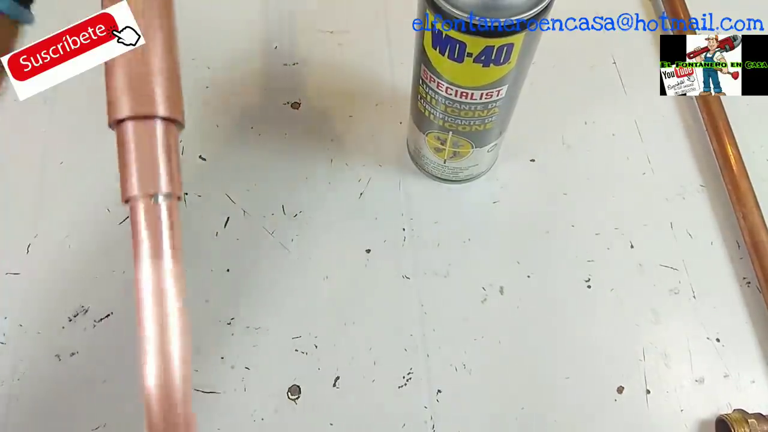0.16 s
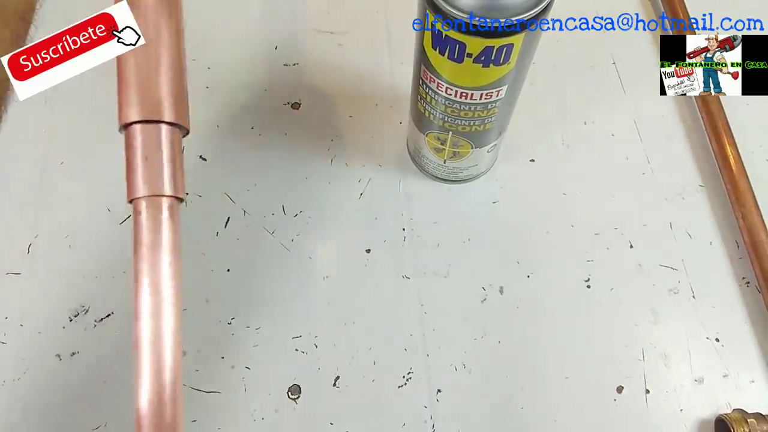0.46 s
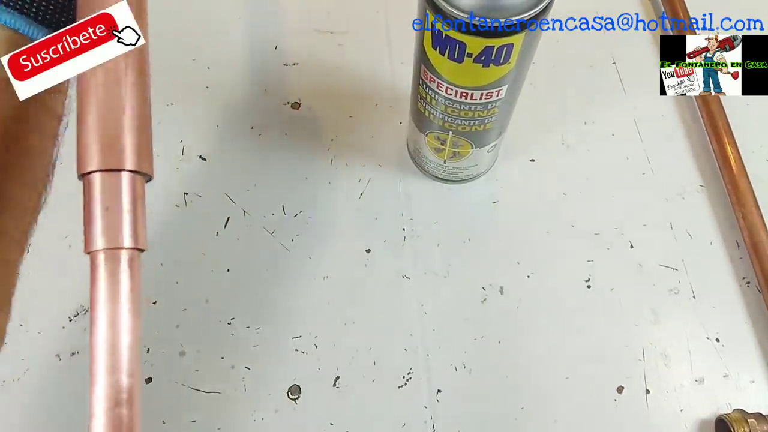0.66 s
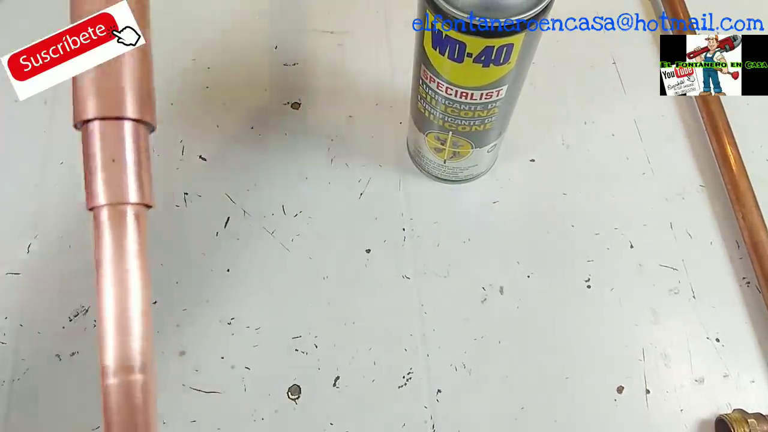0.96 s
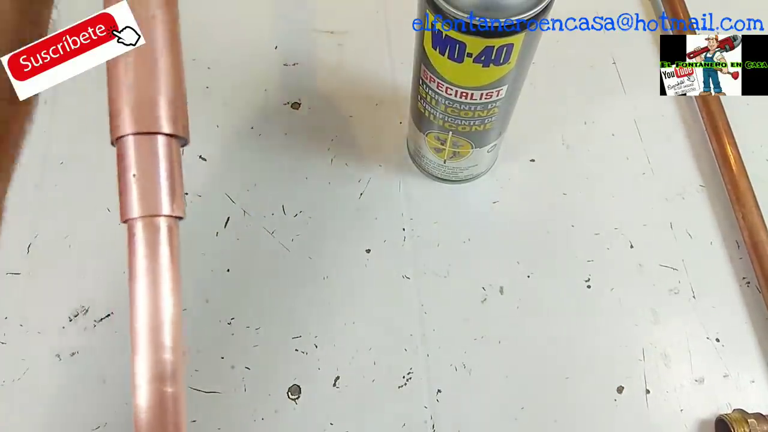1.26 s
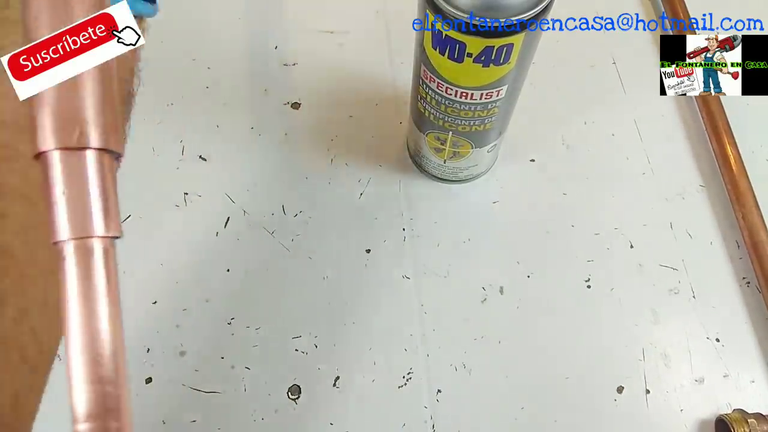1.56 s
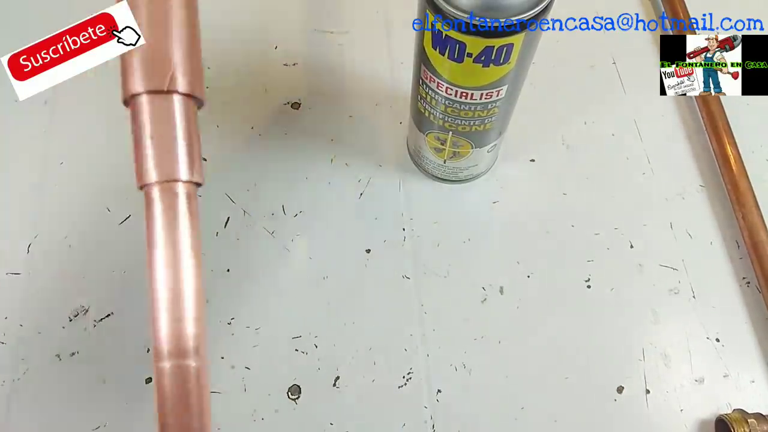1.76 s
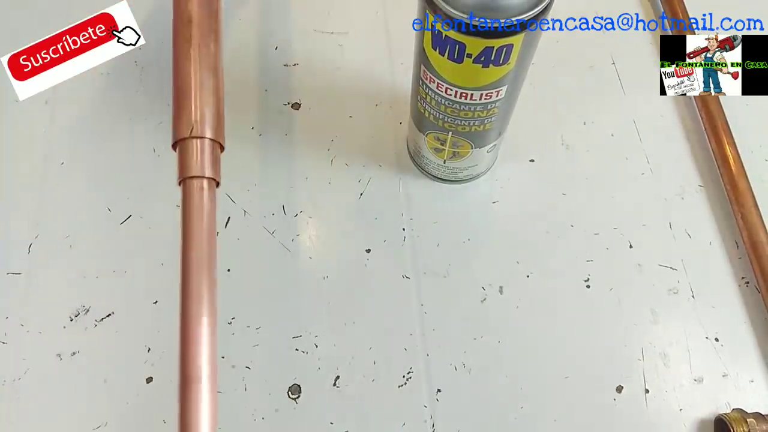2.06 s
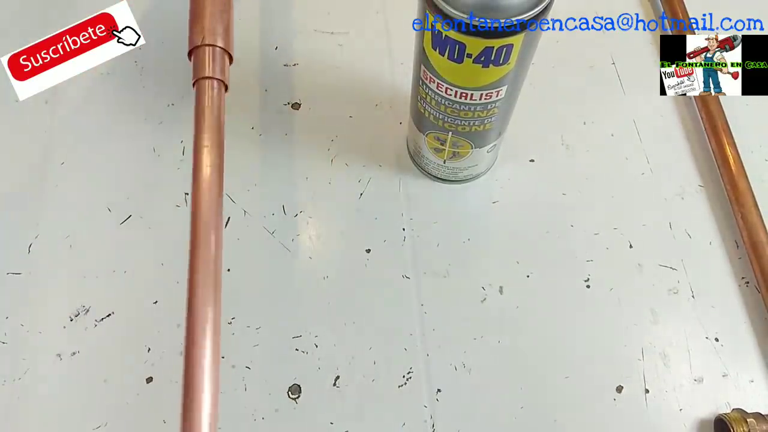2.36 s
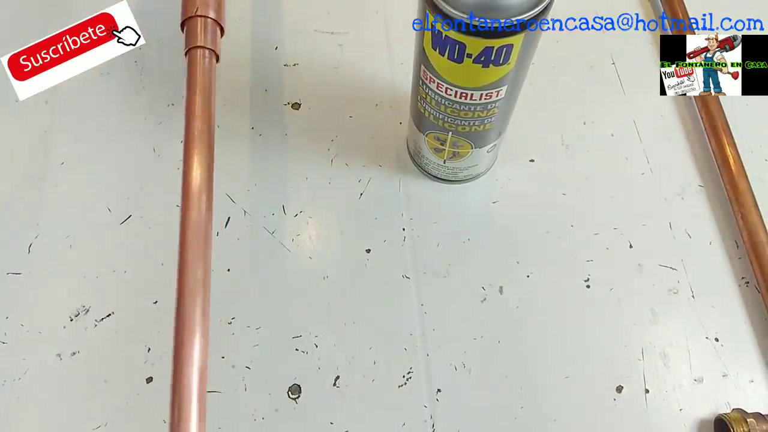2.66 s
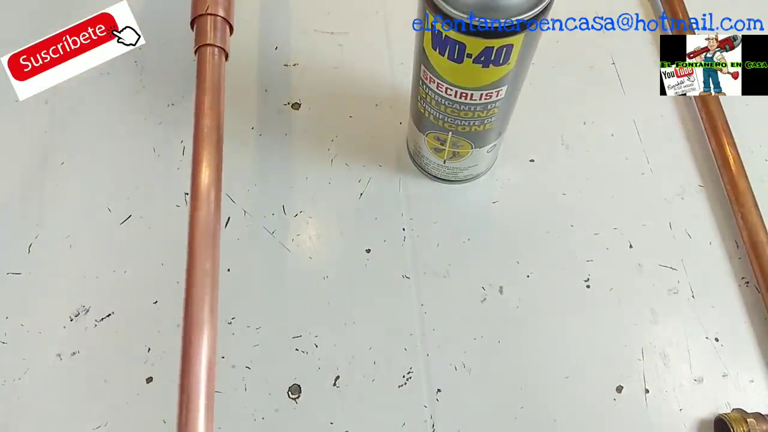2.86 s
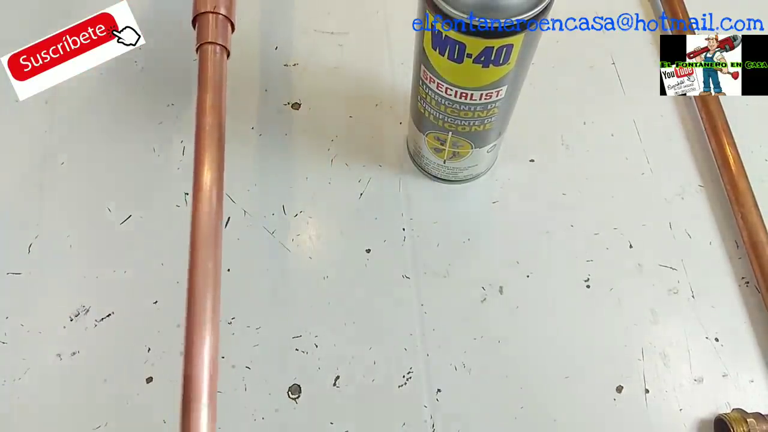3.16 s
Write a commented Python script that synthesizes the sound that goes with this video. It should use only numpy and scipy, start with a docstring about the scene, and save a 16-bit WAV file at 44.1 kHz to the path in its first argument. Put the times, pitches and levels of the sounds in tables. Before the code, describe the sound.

Rubbing of an oiled metal tube sliding in a pipe, ending with a hard metallic knock.

```python
"""Hands twist and slide an oiled copper tube into a wider pipe, close to a two-port microphone.
From the start skin and rubber rings swish on metal and the far end drags on a workbench, all as
shaped, gritty noise; early snags click, then the rings squeak faintly as gliding sines. Later the
pipe bumps on the bench and hums as narrow noise; near the end it knocks once hard, ringing decaying
modes, and brief rubbing follows. Room noise in a small quiet room lies under everything."""
import sys
import numpy as np
from scipy import signal
from scipy.fft import rfft, irfft
from scipy.io import wavfile
from scipy.ndimage import uniform_filter1d, map_coordinates

SR = 44100
rng = np.random.default_rng(int(sys.argv[2]) if len(sys.argv) > 2 else 0)


def materialize(psi):
    """Save the field psi as 16-bit PCM at rate SR to the path in sys.argv[1].

    A 1-D psi becomes a single channel; in a 2-D psi each row is a channel.
    """
    bounded = np.clip(np.atleast_2d(psi).T, -1, 1)
    quanta = np.round(bounded * 32767).astype(np.int16)
    wavfile.write(sys.argv[1], SR, quanta)


def undo_db(level):
    """Turn decibels back into plain size, where 20 dB means ten times bigger."""
    steps = np.asarray(level, float) / 20
    return 10 ** steps


N = 145530

# Strokes of the hands, in groups.
# Each row: time in seconds, level of the swish in dB, lift of the rubbing's top octave in dB.
STROKES = [
    [(0.0, -52.5, -7), (0.03, -39.5, -4), (0.07, -38, 1), (0.14, -48.5, -3), (0.19, -34.5, -2.5),
     (0.27, -44.5, -2.5), (0.33, -36, -1.5), (0.43, -38.5, 3), (0.45, -40.5, 2), (0.49, -36.5, 5.5),
     (0.56, -35.5, -1), (0.6, -41.5, -2.5), (0.67, -40.5, -1), (0.76, -50, 1), (0.78, -54.5, -1),
     (0.87, -56.5, 0), (0.88, -44.5, -2), (0.91, -36, 0.5), (0.99, -44, -1), (1.04, -32.5, -1.5),
     (1.1, -35, 6), (1.23, -41, 4), (1.25, -36, 0), (1.31, -47, -2.5), (1.49, -63.5, 3), (1.52, -54, -6),
     (1.58, -60, -6), (1.62, -38, 0), (1.7, -36, 1.5), (1.75, -47, 2), (1.79, -34.5, -3.5),
     (1.88, -36.5, 7), (1.99, -43.5, 3.5), (2.01, -35, 0), (2.04, -40.5, -6), (2.16, -52.5, -7),
     (2.24, -52, -3), (2.31, -42, 1), (2.48, -46, 3), (2.56, -54.5, -1), (2.65, -48, -2),
     (2.77, -62.5, 3.5), (2.91, -56.5, -4), (3.0, -76, 0)],
    [(3.16, -55, -8), (3.176, -56.5, -1), (3.252, -44, -1), (3.3, -39, -1)],
]
# Rubbing of the tube, in groups.
# Each row: time in seconds, level of the scrape in dB, level of the drag on the bench in dB.
RUBBING_LEVELS = [
    [(0.0, -64, -54), (0.022, -55, -59), (0.036, -61, -57), (0.046, -60, -59), (0.108, -59, -66),
     (0.126, -60.5, -64), (0.14, -66, -73), (0.146, -76, -65), (0.152, -83, -78), (0.185, -46.5, -60)],
    [(0.25, -52.5, -62.5), (0.34, -44.5, -50), (0.44, -54.5, -49.5), (0.57, -53, -53), (0.59, -55.5, -53),
     (0.66, -49.5, -46), (0.81, -61, -55.5), (0.92, -60.5, -59.5), (0.99, -58.5, -55), (1.04, -46, -46.5),
     (1.17, -55, -53.5), (1.26, -52.5, -51.5), (1.31, -61, -71), (1.31, -59, -54), (1.45, -68.5, -87.5),
     (1.55, -73, -81), (1.59, -65.5, -92), (1.63, -61, -74), (1.69, -59, -94), (1.75, -65.5, -78),
     (1.83, -48.5, -95), (1.85, -57, -64), (1.88, -63, -80), (1.95, -56, -61), (2.0, -57, -70),
     (2.02, -51.5, -56), (2.04, -60, -69), (2.06, -49.5, -47), (2.1, -58, -54), (2.23, -65, -71.5),
     (2.3, -55, -66), (2.39, -62.5, -71.5), (2.58, -60.5, -73), (2.59, -60, -64), (2.61, -60, -62),
     (2.68, -59.5, -54.5), (2.7, -55, -46), (2.73, -56.5, -44.5), (2.75, -65, -56), (2.83, -60, -57),
     (2.86, -59, -70), (2.94, -58, -55), (3.01, -59, -53.5), (3.02, -58.5, -55.5)],
    [(3.22, -62, -58), (3.28, -50.5, -63), (3.3, -71, -58)],
]
# Spectra of the three kinds of friction. Each row: frequency in Hz, relative level in dB.
SWISH_SPECTRUM = [(1000, -49), (1600, -19), (2200, -12), (3000, -8.5), (4000, -7), (5500, -5.5), (7000, -8),
                  (9000, -2), (11600, -3), (13500, -5.5), (15300, -11.5), (15650, -39)]
SCRAPE_SPECTRUM = [(450, -18.5), (700, -5), (1200, -1.5), (1800, 0.5), (2600, -5.5), (3600, -58)]
DRAG_SPECTRUM = [(40, -47), (110, -10.5), (180, -7), (260, 5), (315, -3), (385, 0.5), (435, -5), (490, 4),
                 (570, -7.5), (900, -17.5), (1500, -70)]
# Weight of the lift at the top of the rubbing. Each row: frequency in Hz, weight in dB.
TOP_OF_SWISH = [(8500, -40), (10500, -6), (12500, 0)]
# The pipe end lands and chatters. Each row: start in seconds, strength in dB, contact in ms.
KNOCK = [(3.0348, -13.5, 0.065), (3.0363, -13, 0.056), (3.041, -23, 0.23), (3.0444, -23.5, 0.36),
         (3.049, -28.5, 0.4)]
# Bumps on the bench. Each row: start in seconds, strength in dB, contact in ms.
BUMPS = [(1.024, -34.5, 0.77), (1.925, -46, 0.84), (2.056, -38.5, 1.14), (2.5912, -39.5, 0.85),
         (2.6927, -31, 0.97), (2.718, -27, 0.92), (2.759, -34, 0.95), (2.799, -37.5, 1.0),
         (2.893, -42, 1.0), (2.936, -40.5, 1.15)]
# Modes of pipe and bench top. Each row: frequency in Hz, relative level in dB, 60 dB decay in seconds.
BENCH_MODES = [(103.7, -9, 0.57), (213.6, -14.5, 0.55), (269.7, -15, 0.46), (365, -3, 0.095),
               (504, 4, 0.046), (660, 2.5, 0.02), (854, -1.5, 0.062), (1137, 5, 0.043), (1323, 9.5, 0.043),
               (1447, -2, 0.23), (1555, 9, 0.045), (1712, -2, 0.08), (2435, 4.5, 0.08), (2640, 3.5, 0.04),
               (3990, -9.5, 0.056), (4540, -17, .15), (5560, -9, .05), (6780, -18.5, .1),
               (8000, -11, 0.082), (9400, -12, 0.1)]
# Rattle of the pipe and room tail after a blow.
# Each row: centre in Hz, half-width in octaves, relative level in dB, 60 dB decay in seconds.
TAIL_BANDS = [(100.4, 0.18, -36.5, 0.6), (210, 0.87, -20.5, 0.43), (359, 0.25, -15.5, 0.32),
              (562, 0.72, -13.5, 0.24), (960, 0.43, -22, 0.38), (1464, 0.29, -14.5, 0.37),
              (1804, 0.25, -14, 0.21), (2530, 0.21, -21, 0.4), (3530, 1, -20.5, 0.32),
              (4700, 0.31, -17, 0.073), (6900, 0.078, -34, 0.18), (8420, 0.42, -16, 0.048),
              (11400, 0.2, -19.5, 0.18)]
# The hand shades the left port from part of the ring. Each row: frequency in Hz, gain in dB.
SHADE = [(1900, 0), (2550, -16), (3400, -1.5)]
# Short hard snags of the tube rim. Each row: start in seconds, click level in dB, pitch in Hz.
SNAGS = [(0.1893, -42, 900), (0.1923, -33, 2600), (0.213, -29, 1690), (.2195, -33, 1800),
         (0.2317, -30, 1110), (1.428, -63, 706), (2.052, -43, 110), (2.591, -41, 900), (2.696, -39, 1510),
         (2.7185, -39, 795), (2.722, -46, 1600), (2.76, -43, 1000)]
# The pipe hums while it slides on the bench.
# Each row: start in seconds, length in seconds, pitch in Hz, width in Hz, level in dB.
HUMS = [(2.8, 0.16, 1000, 136, -51.5), (2.622, 0.051, 183, 50, -54), (2.783, 0.081, 184, 31, -51.5),
        (2.896, 0.1, 380, 44, -48), (2.906, 0.093, 670, 35, -61), (2.89, 0.12, 203, 84, -49.5),
        (2.06, 0.65, 284, 56, -68.5)]
# Squeaks of the rings. Each row: start in seconds, length in seconds, first pitch in Hz,
# midway pitch in Hz, last pitch in Hz, level in dB before wavering.
SQUEAKS = [(.605, .1, 9000, 9800, 8700, -48), (.712, .062, 12700, 12850, 11500, -54),
           (.795, .055, 6600, 7400, 7300, -64), (.80, .05, 8600, 9600, 9500, -65)]
# Spectrum of room tone and hiss. Each row: frequency in Hz, relative level in dB.
ROOM_SPECTRUM = [(20, 23), (45, 27), (80, 12), (155, 15), (400, -24), (630, 17), (940, -14), (2700, 12),
                 (6000, 5), (11800, 3.5), (14500, -19), (15650, -31)]
# Colour of the left port over the right. Each row: frequency in Hz, difference in dB.
LEFT_OVER_RIGHT = [(100, -2), (400, -1.5), (1000, -1), (2200, -0.5), (4400, -2), (8000, -2.5), (13000, 5.5)]

# share of the power that comes from walls and hands rather than straight (0-1)
SWISH_WET, SCRAPE_WET, DRAG_WET = 0.6, 0.5, 0.2
ROOM_DB = -61.5
LEFT_LAG_MS = 0.2783
RADIATES_ABOVE_HZ = 300
LOW_CUT_HZ, TOP_HZ = 143, 15550
SNAG_CYCLES, CRACKLE_DB = 0.4, -12.5  # width of the click envelope; crackle relative to the click


def level(x, db):
    """Root-mean-square normalisation: scale a signal to a level in dB."""
    return x * undo_db(db) / np.sqrt(np.mean(x ** 2))


def colour(x, points, share=1):
    """Linear filtering: weigh the spectrum by (Hz, dB) points on a logarithmic frequency axis."""
    points = np.array(points, float)
    hz = np.arange(N // 2 + 1) * SR / N + 1  # 1 Hz added to keep the logarithm finite
    gain_db = np.interp(np.log(hz), np.log(points[:, 0] + 1), points[:, 1])
    return irfft(rfft(x) * undo_db(share * gain_db), N)


def walk(rate_hz):
    """Slow random modulation: random levels joined by straight slews, with a spread near 1."""
    hold = int(SR / rate_hz)
    steps = np.repeat(rng.standard_normal(N // hold + 1), hold)
    return 1.2 * uniform_filter1d(steps, hold)[:N]


def grit(spread_db):
    """Stick-slip: dense tiny slips of uneven size make a noise of uneven strength."""
    return rng.standard_normal(N) * undo_db(spread_db * rng.exponential(size=N))


def ports(x):
    """Interaural-type delay: the sound reaches the right port first."""
    delayed = map_coordinates(x, [np.arange(N) - LEFT_LAG_MS * SR / 1000], mode="nearest")
    return np.array([delayed, x])


def spread(make, wet):
    """Coherence: a direct part heard by both ports and a scattered part that differs between them."""
    direct = ports(make())
    scattered = np.array([make(), make()])
    return np.sqrt(1 - wet) * direct + np.sqrt(wet) * scattered


def rubbing():
    """Friction noise: swish, scrape and drag, each gritty and flickering, follow the hands."""
    t = np.arange(N) / SR
    strokes, rubs = np.vstack(STROKES), np.vstack(RUBBING_LEVELS)
    shared_jerk = walk(30.34)
    # time, level in dB, spectrum, scattered share, grit in dB, flicker in dB, flicker rate in Hz
    frictions = (
        (strokes[:, 0], strokes[:, 1], SWISH_SPECTRUM, SWISH_WET, 2.6, 1.2, 120),
        (rubs[:, 0], rubs[:, 1], SCRAPE_SPECTRUM, SCRAPE_WET, 2.5, 0.9, 90),
        (rubs[:, 0], rubs[:, 2], DRAG_SPECTRUM, DRAG_WET, 2.5, 1.1, 45))
    out = 0
    for when, db, spectrum, wet, grit_db, flicker_db, rate_hz in frictions:
        flicker = flicker_db * (walk(rate_hz) + shared_jerk)
        envelope = undo_db(np.interp(t, when, db) + flicker)
        noise = spread(lambda: level(colour(grit(grit_db), spectrum), 0), wet)
        out = out + envelope * noise
    return out


def brighten(x):
    """Time-varying spectral tilt: the top of the rubbing comes and goes with the grip."""
    strokes = np.vstack(STROKES)
    lift = undo_db(np.interp(np.arange(N) / SR, strokes[:, 0], strokes[:, 2])) - 1
    return x + lift * np.array([colour(port, TOP_OF_SWISH) for port in x])


def blow(start, db, contact_ms, scatter_db):
    """Impact excitation: one contact rings the modes and leaves a noisy tail; long contact is dull."""
    first = int(start * SR)
    t = np.arange(min(N - first, SR // 2)) / SR
    span = slice(first, first + len(t))

    def softness(hz):
        """Finite contact time: modes faster than the contact are excited weakly."""
        return 1 / (1 + (hz * contact_ms / 1000 * 1.55) ** 3)

    def fade(t60):
        """Exponential damping: the level falls by 60 dB in t60 seconds."""
        return np.exp(-np.log(1000) * t / t60)

    ring = np.zeros(N)
    for mode_hz, mode_db, t60 in BENCH_MODES:
        gain = undo_db(mode_db + scatter_db * rng.standard_normal()) * softness(mode_hz)
        # each blow detunes the modes in proportion to its scatter
        pitch_hz = mode_hz * (1 + scatter_db * 0.0186 * rng.standard_normal())
        ring[span] -= gain * fade(t60) * np.sin(2 * np.pi * pitch_hz * t)

    tail = np.zeros((2, N))
    hz = np.arange(len(t) // 2 + 1) * SR / len(t) + 1
    onset = 1 - np.exp(-t / 0.0003)
    for centre_hz, octaves, band_db, t60 in TAIL_BANDS:
        noise = rng.standard_normal((3, len(t)))
        alike = 1 / (1 + (centre_hz / 900) ** 2)  # long waves are alike at the two ports
        mixed = np.sqrt(alike) * noise[0] + np.sqrt(1 - alike) * noise[1:]
        bell = np.exp(-(np.log2(hz / centre_hz) / octaves) ** 2)
        band = irfft(rfft(mixed) * bell, len(t))
        tail[:, span] += band / band.std() * undo_db(band_db) * softness(centre_hz) * fade(t60) * onset

    radiation = signal.butter(2, RADIATES_ABOVE_HZ, "high", fs=SR, output="sos")
    left, right = ports(signal.sosfilt(radiation, ring))
    return undo_db(db) * (undo_db(-7.5) * np.array([colour(left, SHADE), right]) + tail)


def snags():
    """Sudden release: a click of about one cycle with a few ms of crackle after it."""
    length = 800
    out, t = np.zeros(N), np.arange(length) / SR
    for start, db, hz in SNAGS:
        band = signal.butter(1, [hz / 2, hz * 2], "band", fs=SR)
        crackle = signal.lfilter(*band, rng.standard_normal(length))
        crackle = crackle / crackle.std() * np.exp(-t / 0.0033)
        click = np.sin(2 * np.pi * hz * t) * np.exp(-((t * hz - 1) / SNAG_CYCLES) ** 2)
        first = int(start * SR)
        out[first:first + length] += undo_db(db) * (click + undo_db(CRACKLE_DB) * crackle)
    return out


def hums():
    """Sustained resonance: friction keeps one resonance sounding for a moment."""
    t, hz = np.arange(N) / SR, np.arange(N // 2 + 1) * SR / N
    out = 0
    for start, length, pitch_hz, width_hz, db in HUMS:
        resonance = 1 / (1 + ((hz - pitch_hz) / width_hz * 2) ** 4)
        tone = irfft(rfft(rng.standard_normal(N)) * resonance, N)
        arch = np.sin(np.pi * np.clip((t - start) / length, 0, 1)).clip(0)
        out = out + level(tone, db) * np.sqrt(arch)
    return ports(out)


def squeaks():
    """Stick-slip oscillation: thin wavering tones glide along a curve as a rubber ring slips."""
    out = np.zeros(N)
    for start, length, first_hz, middle_hz, last_hz, db in SQUEAKS:
        u = np.arange(int(length * SR)) / (length * SR)
        # parabola through the three pitches
        hz = first_hz * (1 - u) * (1 - 2 * u) + middle_hz * 4 * u * (1 - u) + last_hz * u * (2 * u - 1)
        tone = np.sin(2 * np.pi * np.cumsum(hz) / SR)
        i = int(start * SR)
        out[i:i + len(u)] += undo_db(db) * np.sin(np.pi * u) ** 0.3 * tone
    return out * undo_db(4 * walk(60))


def room():
    """Diffuse field: quiet room tone and microphone hiss, nearly independent at the two ports."""
    return level(spread(lambda: colour(rng.standard_normal(N), ROOM_SPECTRUM), 0.99), ROOM_DB)


def scene():
    """Superposition: the pressures of all sources add at the two ports."""
    knock = sum(blow(start, db, ms, 0) for start, db, ms in KNOCK)
    bumps = sum(blow(start, db, ms, 2.5) for start, db, ms in BUMPS)
    return brighten(rubbing()) + knock + bumps + snags() + hums() + squeaks() + room()


def roll_off(x):
    """The treble ends steeply here."""
    return signal.sosfilt(signal.butter(12, 16280, fs=SR, output="sos"), x)


def record(dry):
    """Transduction: ports differ in colour, deep bass and top are lost, the loudest peaks are rounded."""
    x = np.array([colour(dry[0], LEFT_OVER_RIGHT, 0.5), colour(dry[1], LEFT_OVER_RIGHT, -0.5)])
    x = signal.sosfilt(signal.butter(2, LOW_CUT_HZ, "high", fs=SR, output="sos"), x)
    x = x / (1 + (x / 0.95) ** 4) ** 0.25
    x = signal.sosfilt(signal.ellip(10, 0.2, 70, TOP_HZ, fs=SR, output="sos"), x)
    return roll_off(x)


dry = scene()
out = record(dry)
materialize(out)
```